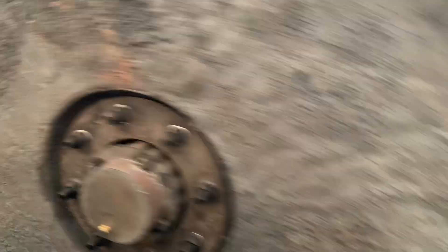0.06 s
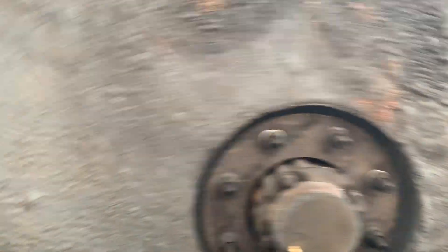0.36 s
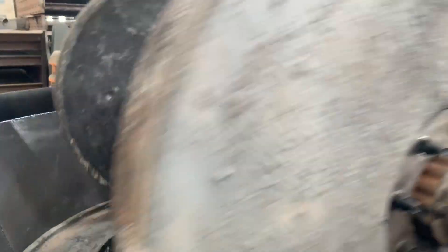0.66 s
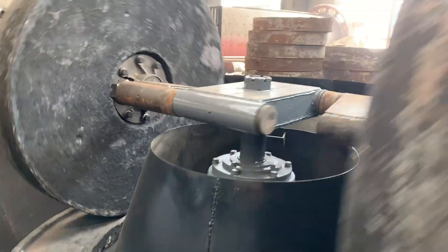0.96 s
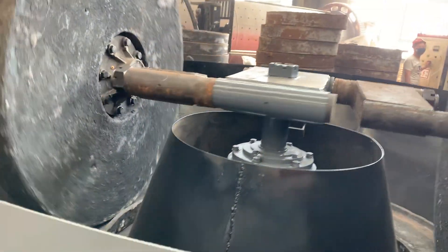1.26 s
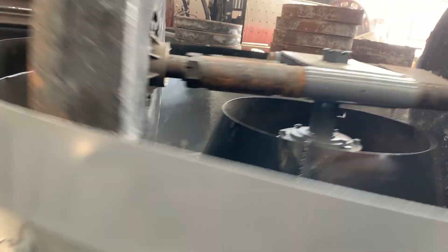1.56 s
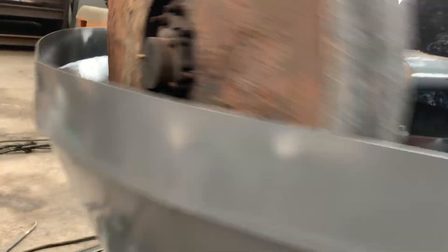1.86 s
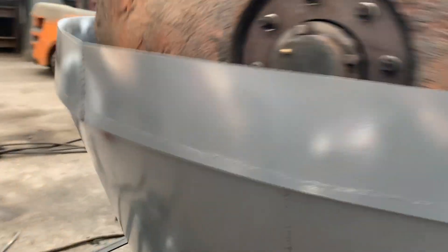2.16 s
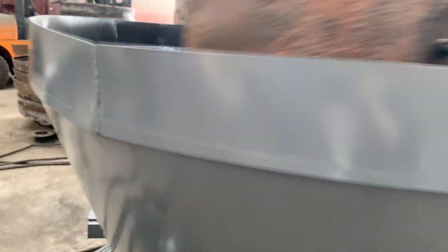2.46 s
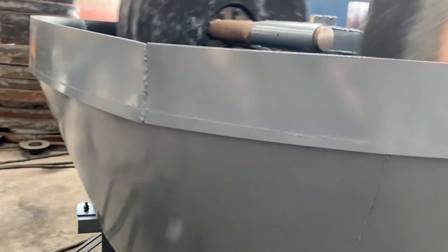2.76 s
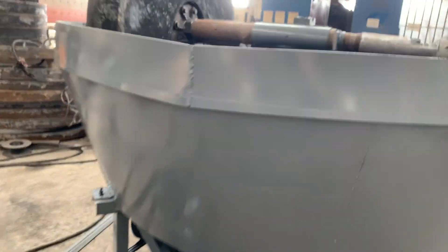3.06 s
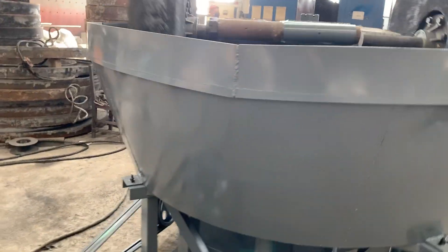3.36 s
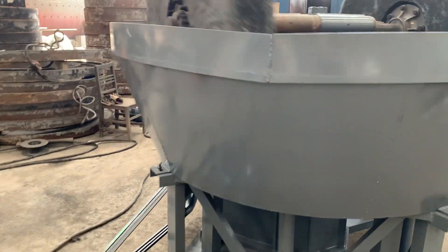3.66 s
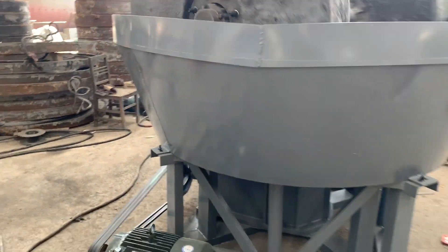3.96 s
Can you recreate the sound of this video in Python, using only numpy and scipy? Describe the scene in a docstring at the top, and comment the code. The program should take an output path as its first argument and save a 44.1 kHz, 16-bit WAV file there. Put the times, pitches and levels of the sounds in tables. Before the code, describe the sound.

A roller mill grinds ore with a deep rumble, gritty crunches, thuds and steel clangs.

```python
"""A steel clang and a crunch over a deep rumble: two heavy rollers run round the pan of an ore mill.
They grind steadily over grit, crush lumps in short crunches and snap hard stones. Every bump makes
the pan boom, and hard drops set its steel wall clanging. The stereo pair is close to the rollers at
first; between 1.6 and 3 s they pass behind the pan's wall and the clangs turn dull."""
import sys
import numpy as np
from scipy import signal
from scipy.io import wavfile
from scipy.ndimage import uniform_filter1d, minimum_filter1d

SR = 44100
rng = np.random.default_rng(int(sys.argv[2]) if len(sys.argv) > 2 else 0)


def transcribe(signal):
    """Save signal, clipped to [-1, 1], as a 16-bit WAV file at the path in sys.argv[1]."""
    frames = np.atleast_2d(signal).T
    limited = np.clip(frames, -1, 1)
    pcm = np.round(limited * 32767).astype(np.int16)
    wavfile.write(sys.argv[1], SR, pcm)


N = 176400
TIME = np.arange(N) / SR


def from_db(db):
    """Decibels to gain."""
    return 10 ** (np.asarray(db) / 20)


def rms_one(x):
    """Scale to rms 1."""
    return x / np.sqrt(np.mean(x ** 2) + 1e-20)


def level(rows):
    """Gain over time from rows of time_s, level_db."""
    return from_db(np.interp(TIME, *np.transpose(rows)))


def at_hz(points, hz):
    """Read a table on a log-frequency axis."""
    freqs, values = np.transpose(points)
    return np.interp(np.log(hz), np.log(freqs), values)


def drift(rate_hz):
    """Smooth random wander of rms about 1."""
    step, run_in = 40, 2000
    pole = np.exp(-2 * np.pi * rate_hz * step / SR)
    noise = rng.standard_normal(N // step + run_in + 2)
    slow = signal.lfilter([1], [1, -2 * pole, pole * pole], noise)[run_in:]
    return np.interp(np.arange(N) / step, np.arange(len(slow)), rms_one(slow))


def burst(start_s, rise_s, hold_s, t60_s):
    """Envelope: straight rise, then an exponential fall from hold_s after the start."""
    age = TIME - start_s
    return np.clip(age / rise_s, 0, 1) * np.exp(-np.log(1000) * np.clip((age - hold_s) / t60_s, 0, 2))


def blows(rows, rise_s, t60_s):
    """Envelope of blows (start_s, level_db) that add in power."""
    return np.sqrt(sum((from_db(db) * burst(start, rise_s, rise_s, t60_s)) ** 2 for start, db in rows))


def resonate(drive, hz, width_hz):
    """One resonance on a drive; rms 1."""
    peak = signal.butter(1, [hz - width_hz / 2, hz + width_hz / 2], "band", fs=SR, output="sos")
    return rms_one(signal.sosfilt(peak, drive))


def shaken(modes):
    """Modes kept ringing by random knocks, already in full swing at the start; rms 1."""
    return rms_one(sum(from_db(db) * resonate(rng.standard_normal(N + SR), hz, width)[SR:]
                       for hz, width, db in modes))


def grit(grain_db, grains_per_s=1800, spread_db=4):
    """Four unrelated streams of tiny fractures, at grain_db against their fused hiss."""
    shape = (2, 2, N)
    sizes = from_db(spread_db * np.minimum(rng.exponential(1, shape), 5)) * rng.choice([-1, 1], shape)
    grains = rms_one(sizes * (rng.random(shape) < grains_per_s / SR))
    return rng.standard_normal(shape) + from_db(grain_db) * grains


def stereo_bands(drive, spectrum, flicker_db, flicker_hz, treble_from_hz=8000, treble_lag_s=.000297):
    """Four streams become a stereo sound of rms 1, each band with its own level, flicker and width."""
    # likeness of the two microphones: freq_hz, correlation
    likeness = [(260, 0.94), (520, 0.93), (1000, 0.7), (1800, 0.13), (3000, 0.027), (4200, 0.34),
                (5300, -0.44), (6300, 0.41), (7400, 0.18), (9000, 0.76), (15000, 1)]
    # left microphone over right: freq_hz, level_db
    balance = [(130, -1), (500, 1.4), (1200, 2.5), (2600, 0.8), (4200, -0.9), (6300, -4), (9000, -0.5)]
    # lift of the top bands: time_s, level_db
    treble_lift = [(0, 2), (2, 0.5), (2.6, 5.5), (3.3, 3.5), (3.56, 3.5), (4, 4)]
    out, sides = np.zeros((2, N)), np.array([[1], [-1]])
    edges = np.geomspace(125, 16000, 22)
    common_flicker = drift(flicker_hz)
    for k, (low, high) in enumerate(zip(edges, edges[1:])):
        bandpass = signal.butter(2, [low, high], "band", fs=SR, output="sos")
        mid, side = signal.sosfilt(bandpass, drive[k % 2])
        hz = np.sqrt(low * high)
        alike = np.clip(at_hz(likeness, hz), -1, 1)
        band = np.sqrt(1 + alike) * mid + np.sqrt(1 - alike) * side * sides
        band *= from_db(sides * at_hz(balance, hz) / 2)
        if hz > treble_from_hz:
            band[0] = np.roll(band[0], round(treble_lag_s * SR))  # reaches the left microphone late
            band *= level(treble_lift)
        flicker = common_flicker + .5 * drift(flicker_hz)
        out += band * from_db(at_hz(spectrum, hz) + flicker_db * flicker)
    return rms_one(out)


def air(level_db=-43, cutoff_hz=72):
    """Faint buffeting, different at each microphone."""
    lowpass = signal.butter(2, cutoff_hz, fs=SR, output="sos")
    return from_db(level_db) * rms_one(signal.sosfilt(lowpass, rng.standard_normal((2, N))))


def rumble(cutoff_hz=330):
    """The rough track drives the pan's modes without pause."""
    # the pan's modes: pitch_hz, width_hz, relative_db
    pan_modes = [(113.5, 7.4, -3), (128.6, 16.7, 4), (179.5, 5, -2)]
    # how hard the rolling shakes them: time_s, level_db
    pan_level = [(0, -17), (1.2, -17), (1.8, -19), (2.6, -14.5), (3.1, -20.5), (3.46, -26.5), (3.6, -16.5),
                 (4, -19)]
    # the two deepest modes, strong above the open pan: pitch_hz, width_hz, relative_db
    deep_modes = [(56.6, 43, -3.5), (92, 21, -2.5)]
    # their strength at the microphones: time_s, level_db
    deep_level = [(0, -20.5), (1.6, -18.5), (2.1, -31), (2.8, -28), (3.3, -28), (3.6, -35), (4, -31)]
    shaking = level(pan_level) * shaken(pan_modes) + level(deep_level) * shaken(deep_modes)
    return signal.sosfilt(signal.butter(2, cutoff_hz, fs=SR, output="sos"), shaking)


def grinding():
    """Fine ore is ground steadily under the rollers."""
    # strength of the grinding: time_s, level_db
    grind_level = [(0, -21.5), (.25, -24), (.52, -21.5), (.64, -27.5), (.69, -16.5), (.88, -21.5),
                   (1.65, -17.5), (1.95, -19.5), (2.17, -25), (2.35, -27), (2.56, -23), (2.9, -23.5),
                   (3.07, -28.5), (3.3, -26.5), (3.46, -28.5), (3.515, -28), (3.55, -17.5), (3.85, -25.5),
                   (4, -24)]
    # colour of the fine ore: freq_hz, density_db
    spectrum = [(100, -11.5), (220, 1), (400, 0), (670, -4), (920, -13), (1250, -17.5), (2000, -20.5),
                (3600, -25), (5500, -30.5), (8200, -32.5), (11000, -40.5)]
    return level(grind_level) * stereo_bands(grit(grain_db=-7.5), spectrum, flicker_db=.92, flicker_hz=31)


def cracks():
    """Hard stones give way with a sharp snap."""
    # a stone snaps: start_s, level_db
    snaps = [(.336, -31), (.658, -27), (1.152, -29), (1.602, -18.5), (2.513, -33.5), (2.781, -37),
             (3.101, -39.5), (3.334, -33.5)]
    # colour of a snap: freq_hz, density_db
    spectrum = [(300, 4), (1500, -14), (5000, -12), (8000, 6), (15500, -7)]
    spray = stereo_bands(grit(grain_db=-5), spectrum, flicker_db=.8, flicker_hz=60)
    return blows(snaps, rise_s=.002, t60_s=.07) * spray


def crunches():
    """Each lump breaks in a dense, bright spray of fractures that makes the steel ring faintly."""
    # a lump is crushed: start_s, level_db, length_s
    lumps = [(0, -25, 0.0027), (0.195, -38, 0.026), (0.336, -32, 0.024), (0.401, -34.5, 0.035),
             (0.547, -34.5, .02), (0.656, -25.5, 0.042), (0.718, -30.5, 0.059), (0.838, -32, 0.017),
             (0.903, -26.5, 0.021), (0.961, -27, 0.039), (1.058, -25.5, 0.031), (1.15, -25.5, 0.031),
             (1.228, -22.5, 0.034), (1.305, -27.5, 0.076), (1.39, -23.5, 0.029), (1.514, -26, 0.025),
             (1.545, -23.5, 0.074), (1.594, -24, .02), (1.648, -31, 0.083), (1.733, -28.5, 0.079),
             (1.863, -31, 0.021), (1.971, -32.5, 0.059), (2.232, -37.5, 0.12), (2.385, -35.5, 0.016),
             (2.413, -32, 0.029), (2.512, -29.5, 0.039), (2.6, -31.5, 0.043), (2.683, -32, .02),
             (2.775, -33, 0.093), (2.923, -34, 0.017), (3.105, -39, 0.038), (3.161, -37, 0.046),
             (3.247, -33, 0.03), (3.325, -37.5, 0.051), (3.514, -30, 0.082), (3.778, -36, 0.013)]
    # colour of the spray: freq_hz, density_db
    spectrum = [(200, -66), (600, 1), (1200, 7), (2200, 1.5), (4000, 1), (5500, -6.5), (8000, 1),
                (9500, -10.5), (12000, -10), (15500, -15)]
    # thin rings of the steel, against the spray: pitch_hz, level_db
    steel_modes = [(3074, -27.5), (4100, -17.5), (5853, -22), (6163, -22)]
    power = sum((from_db(db) * burst(start, rise_s=.004, hold_s=length, t60_s=.16)) ** 2
                for start, db, length in lumps)
    spray = stereo_bands(grit(grain_db=-5), spectrum, flicker_db=1, flicker_hz=38)
    steel = sum(from_db(db) * resonate(rng.standard_normal((2, N)), hz, width_hz=16)
                for hz, db in steel_modes)
    return np.sqrt(power) * (spray + steel)


def clangs(rise_s=.011, ring_db=-8.5, screen_hz=620):
    """Hard drops ring the wall's crowded, damped modes; a few ring on. Behind the wall they are duller."""
    # a roller drops hard on the steel: start_s, level_db
    drops = [(0, -15), (.09, -23.5), (.654, -14), (.69, -15.5), (.968, -15.5), (1.068, -16.5), (1.162, -15),
             (1.235, -11.5), (1.547, -17), (1.584, -10.5), (2.508, -16.5), (2.6, -23.5), (2.688, -21.5),
             (3.51, -9.5), (3.57, -14)]
    # colour of the crowded modes: freq_hz, density_db
    spectrum = [(100, 20), (220, -1), (350, 3), (700, 1), (980, -18.5), (1600, -15.5), (3500, -20.5),
                (15000, -47)]
    # the wall's strongest modes: pitch_hz, width_hz, relative_db
    wall_modes = [(250.7, 7.8, 11.5), (460, 12, 15.5), (657, 35, 16)]
    # how much of a clang the wall screens from the microphones: time_s, share
    screening = [(1.6, 0), (3, .9)]
    crowd = stereo_bands(rng.standard_normal((2, 2, N)), spectrum, flicker_db=0, flicker_hz=51)
    ringing = from_db(ring_db) * shaken(wall_modes)
    bright = blows(drops, rise_s, t60_s=.33) * crowd + blows(drops, rise_s, t60_s=.55) * ringing
    dull = signal.sosfiltfilt(signal.butter(2, screen_hz, fs=SR, output="sos"), bright)
    screened = np.interp(TIME, *np.transpose(screening))
    return (1 - screened) * bright + screened * dull


def booms(upper_mode_hz=181.7, upper_mode_db=-10):
    """Each bump swells into a short, damped boom, with some of the pan's upper mode in it."""
    # a roller rides over a bump, its place in the pan sets the pitch: start_s, level_db, pitch_hz
    bumps = [(.087, -5, 135.7), (0.269, -8.5, 127.7), (0.319, -9, 106.4), (0.365, -6, 135),
             (.479, -2.5, 125), (.615, -9.5, 120), (0.669, -4, 125), (0.752, -8, 141), (0.852, -14, 129.1),
             (0.923, -7, 142), (.976, -9.5, 180), (1.08, -6, 127), (1.167, -6, 128.9), (1.242, -4, 180.2),
             (1.338, -6, 123.8), (1.38, -9.5, 104.5), (1.45, -9.5, 116), (1.522, -6, 134.7),
             (1.599, -8, 134), (1.67, -10.5, 132), (1.738, -5.5, 131.8), (1.815, -7.5, 126.2),
             (2.021, -11, 128.2), (2.105, -12.5, 131.7), (2.235, -9.5, 132), (2.314, -14, 135),
             (2.506, -8, 109.3), (2.559, -11, 116), (2.624, -16, 142), (2.784, -10, 108),
             (2.945, -15.5, 131), (3.265, -12, 118), (3.515, -5, 120), (3.69, -13, 123.7)]
    out = np.zeros(N)
    for start, db, pitch_hz in bumps:
        main, upper = (np.sin(2 * np.pi * (hz * TIME + rng.random())) for hz in (pitch_hz, upper_mode_hz))
        envelope = from_db(db) * burst(start, rise_s=.0035, hold_s=.019, t60_s=.17)
        out += envelope * (main + from_db(upper_mode_db) * upper)
    return out


def scene(lowest_hz=46):
    """Bass in the middle, grinding spread round it; the mill radiates little below its lowest mode."""
    mill = rumble() + booms() + grinding() + crunches() + cracks() + clangs()
    return signal.sosfilt(signal.butter(8, lowest_hz, "high", fs=SR, output="sos"), mill) + air()


def record(dry, ceiling=.93, limiter_s=.012, cutoff_hz=15750):
    """The recorder's fast limiter holds the peaks; the top is cut."""
    window = round(limiter_s * SR)
    needed_gain = np.minimum(1, ceiling / (np.abs(dry).max(axis=0) + 1e-9))
    smooth_gain = uniform_filter1d(minimum_filter1d(needed_gain, window), window)
    return signal.sosfilt(signal.ellip(10, .1, 80, cutoff_hz, fs=SR, output="sos"), dry * smooth_gain)


dry = scene()
out = record(dry)
transcribe(out)
```